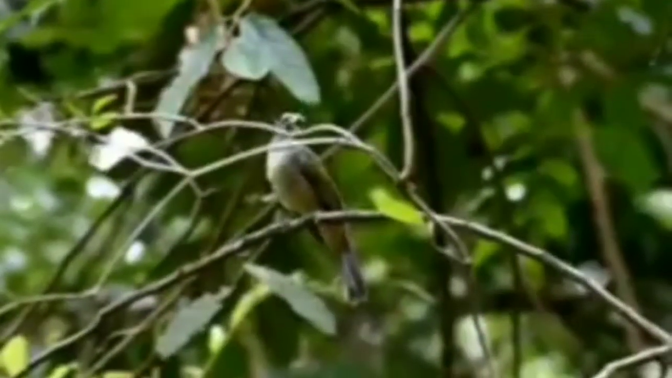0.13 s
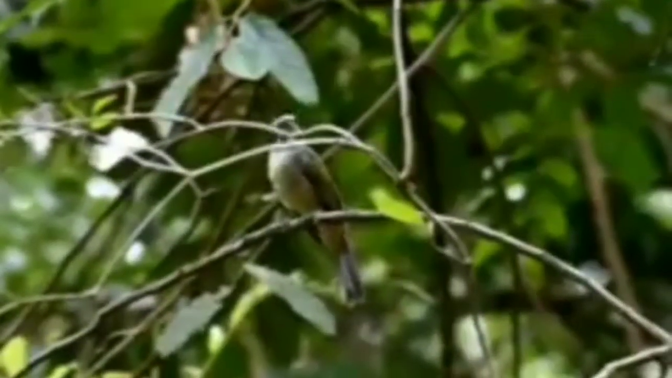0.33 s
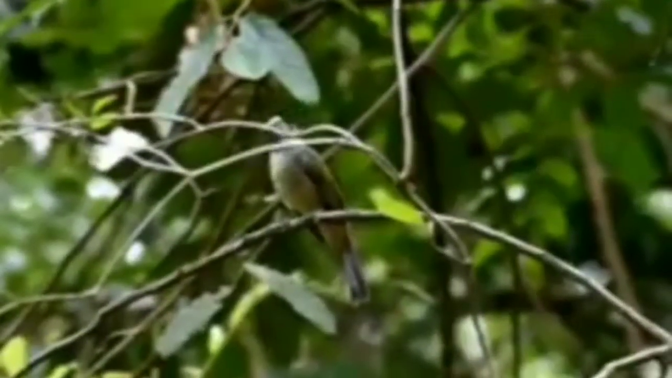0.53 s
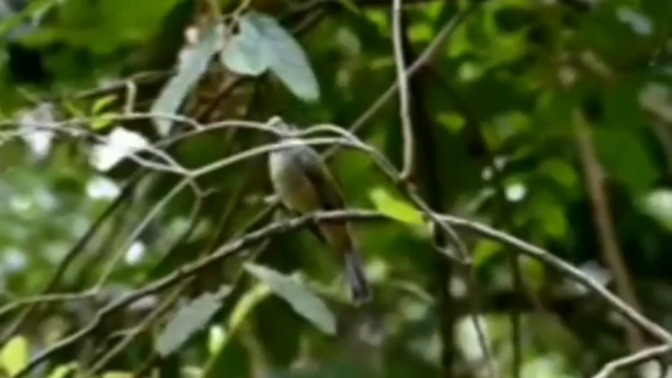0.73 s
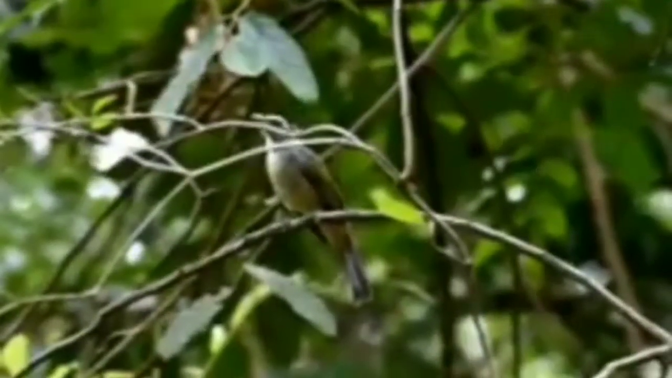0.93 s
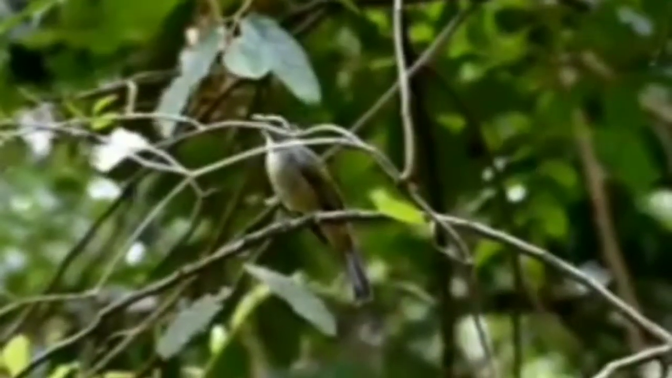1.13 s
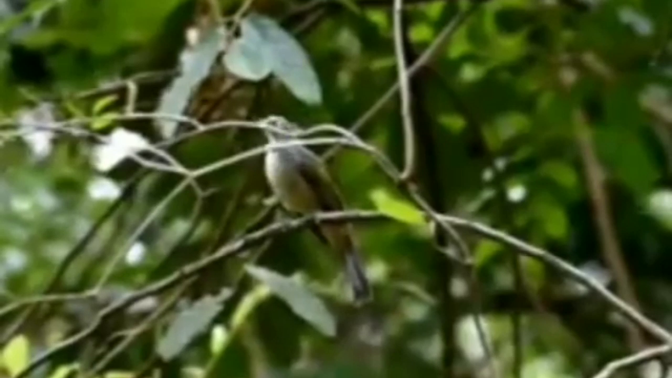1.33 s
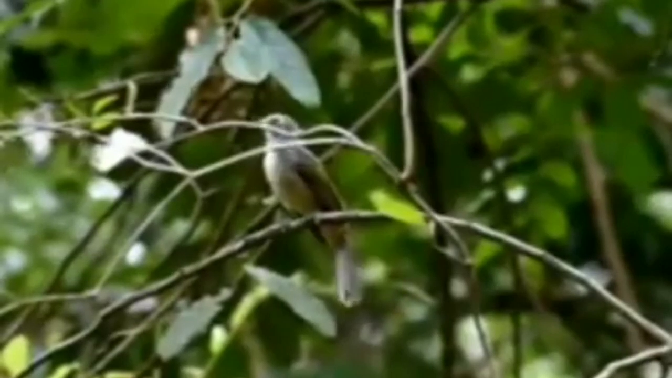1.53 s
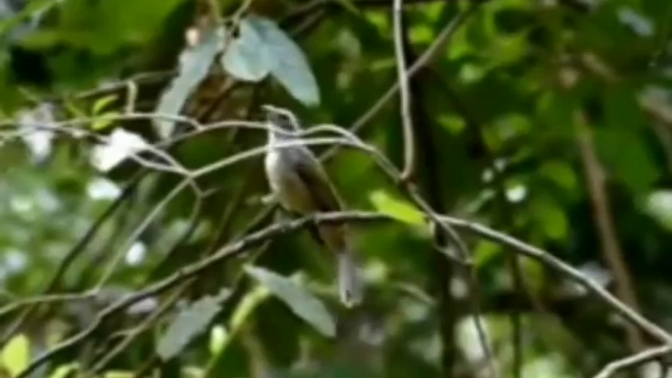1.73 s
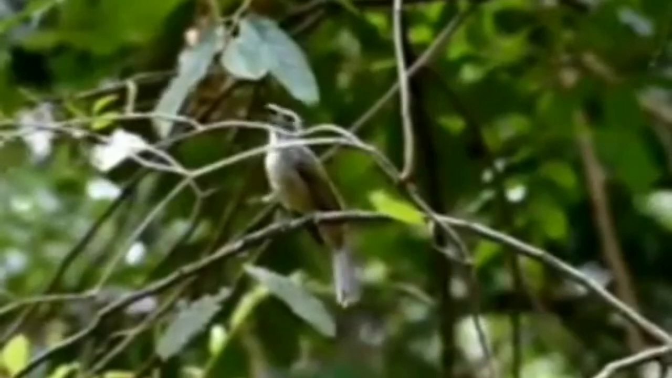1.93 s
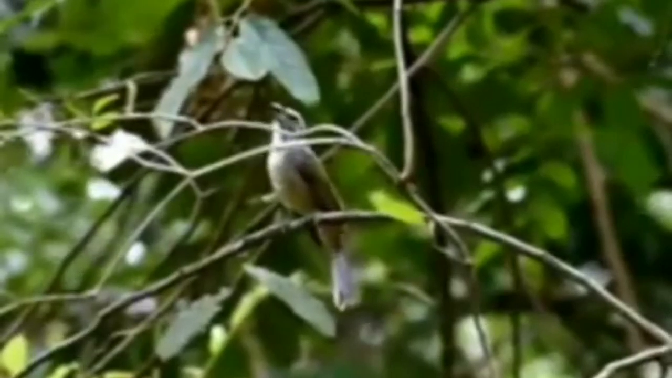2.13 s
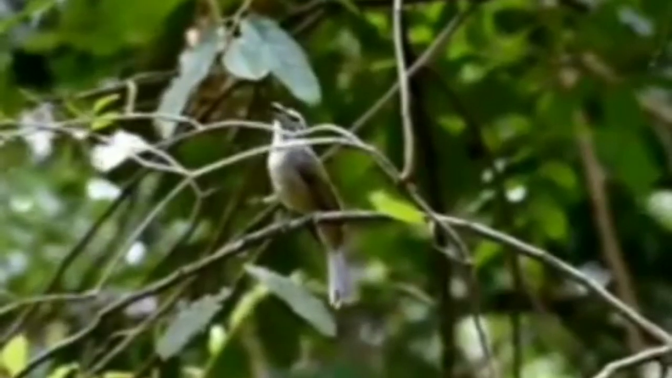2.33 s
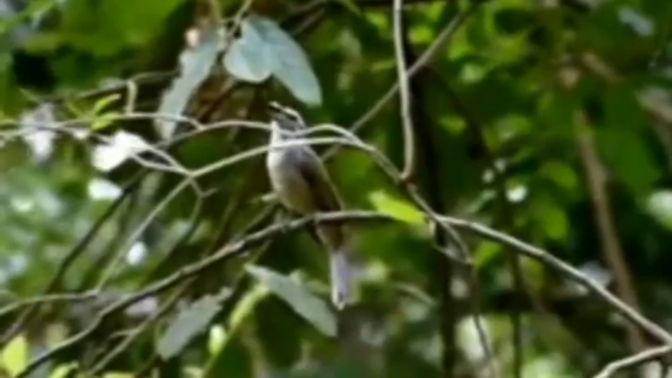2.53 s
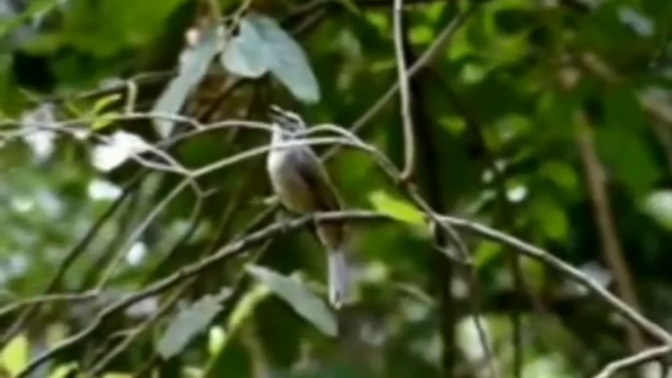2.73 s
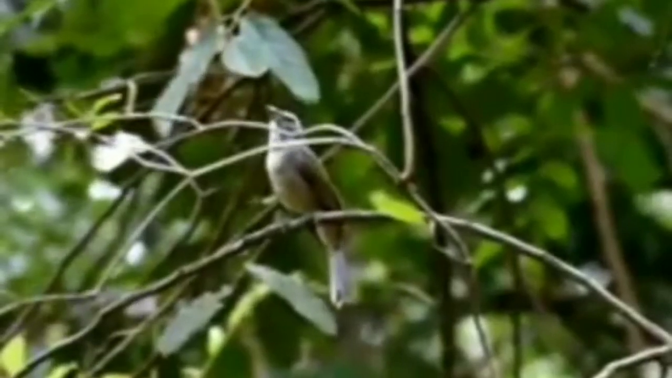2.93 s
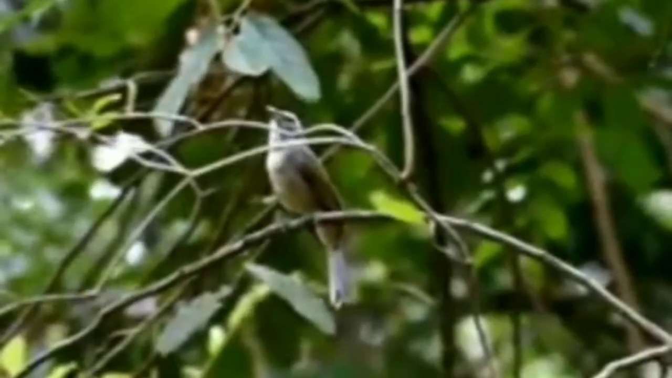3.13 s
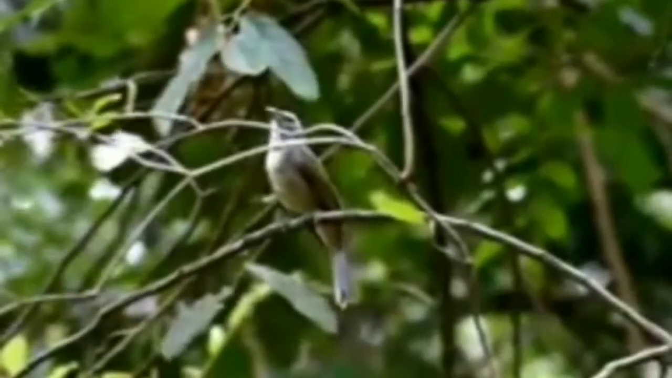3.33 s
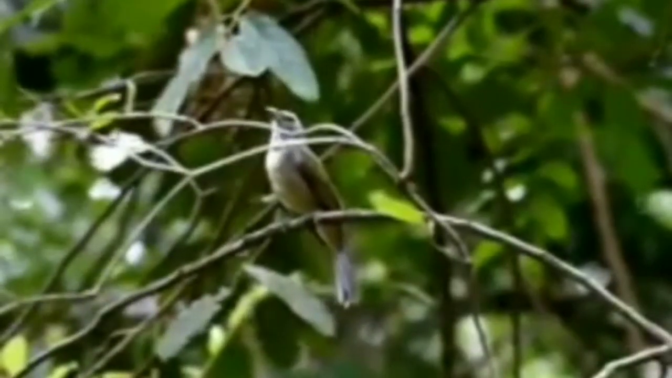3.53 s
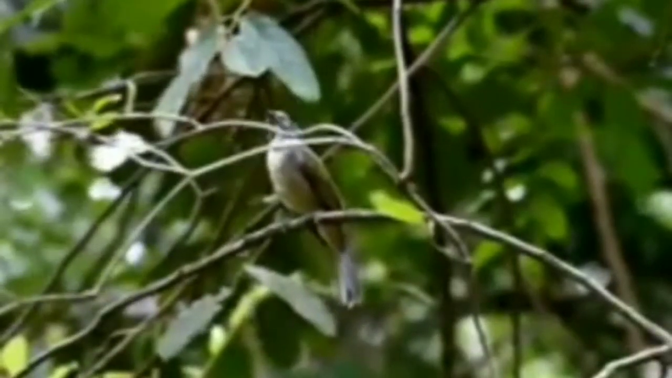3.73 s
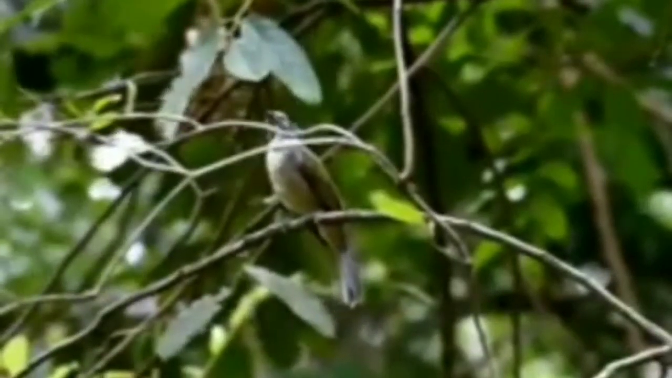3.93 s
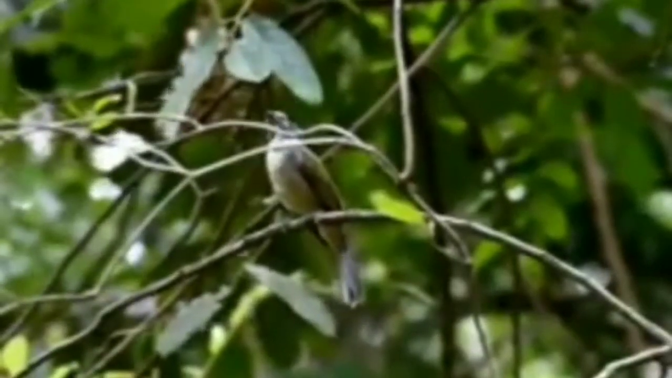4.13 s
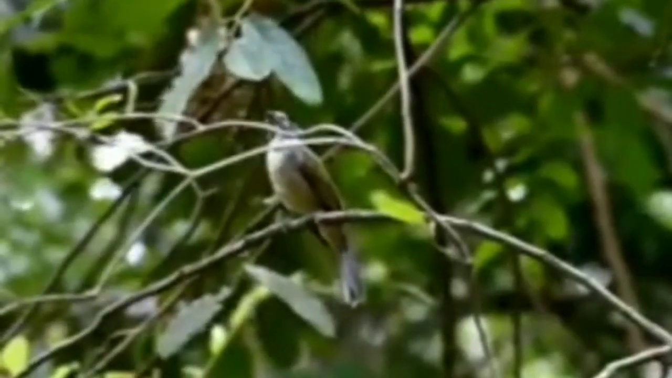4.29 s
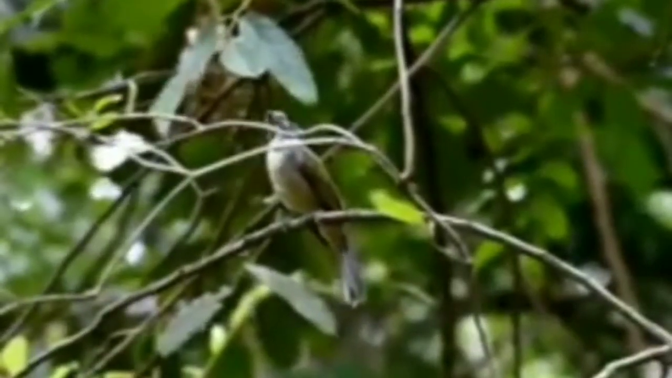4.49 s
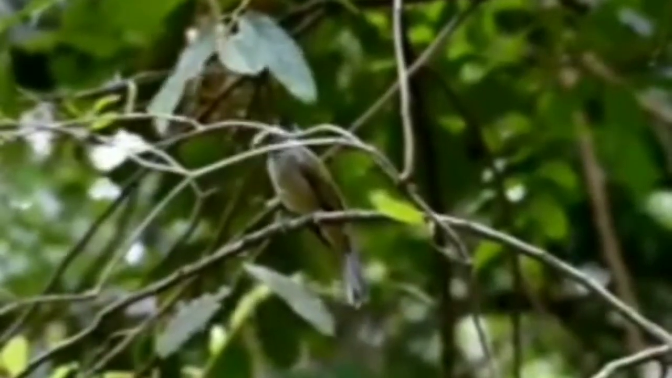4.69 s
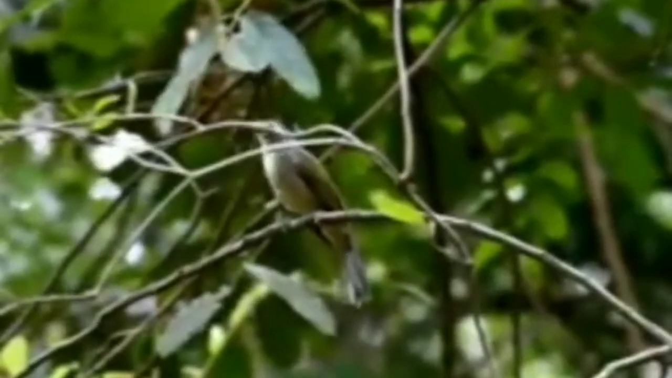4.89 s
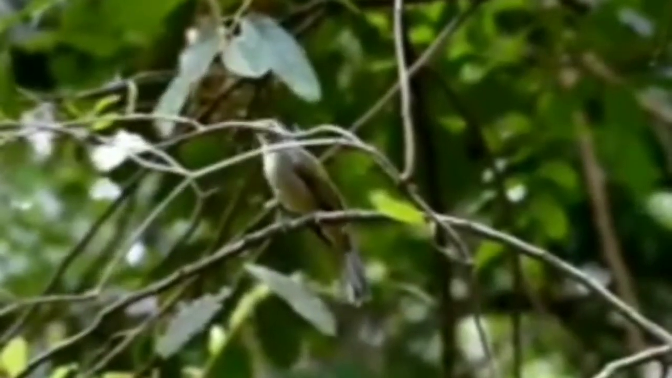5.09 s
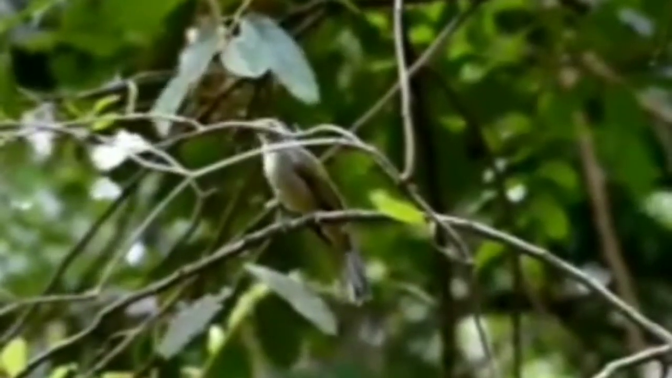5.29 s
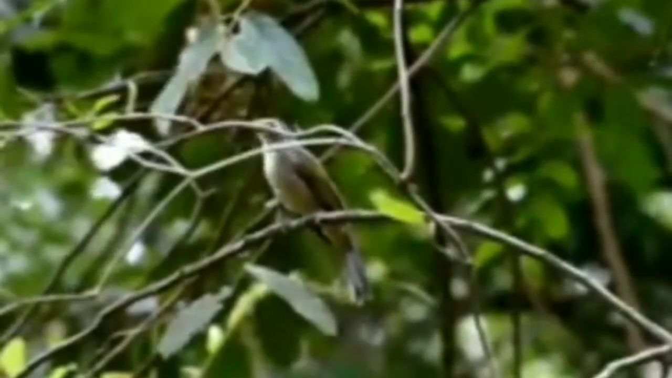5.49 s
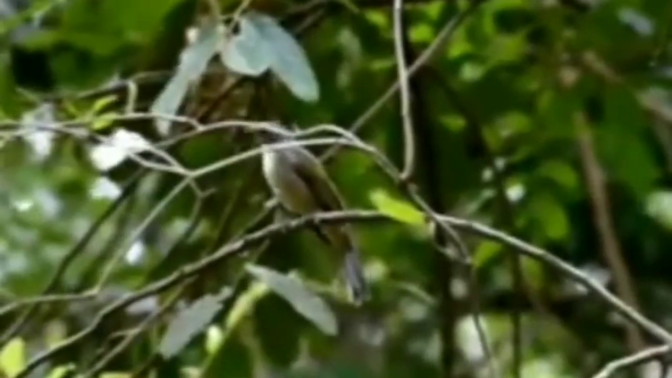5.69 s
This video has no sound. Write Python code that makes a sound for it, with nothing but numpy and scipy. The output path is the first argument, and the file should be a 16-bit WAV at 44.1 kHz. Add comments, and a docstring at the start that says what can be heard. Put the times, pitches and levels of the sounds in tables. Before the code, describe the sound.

A perched songbird is heard fairly close in leafy woodland, its notes followed by short scattered echoes. A more distant bird's slurred call opens, then quiet hiss with a dull double knock. The near phrase runs from about two to nearly four seconds: soft buzz, three strong downward whistles, one gentler drop. Very faint far calls and a leaf rustle precede the next soft buzz. The microphone catches little low end.

```python
"""A saltator sings from a branch in woodland: a soft buzzy note, three loud whistles sliding down, a softer one,
then a new buzz; each is a near sine on a gliding pitch, with a fast trill, faint overtones and a noisy spray.
Other birds, whistling the same way, answer from farther off with trilled slurs. Trunks and leaves scatter
every note into a short tail. Filtered noise makes the hiss of foliage and a brush of leaves, damped sines make
two soft knocks nearby; the recorder cuts away the bass and the extreme treble."""
import sys
import numpy as np
from scipy import signal
from scipy.fft import rfft, irfft
from scipy.io import wavfile
from scipy.ndimage import uniform_filter1d

SR = 44100
rng = np.random.default_rng(int(sys.argv[2]) if len(sys.argv) > 2 else 0)


def master(y):
    """Save y as 16-bit WAV."""
    cut = np.clip(np.atleast_2d(y).T, -1, 1)
    pcm = np.round(cut * 32767)  # scale
    wavfile.write(sys.argv[1], SR, pcm.astype(np.int16))


N = 253575
LOW_CUT_HZ, CUTOFF_HZ = 745, 13200
# a run-in of a quarter second lets a note be under way at 0 s
LEAD = SR // 4
TIME = np.arange(-LEAD, N) / SR  # s


def from_db(db):
    """Decibels to gain."""
    return 10 ** (np.asarray(db) / 20)


def rms_one(x):
    """Scale to unit power."""
    return x / np.sqrt(np.mean(x ** 2) + 1e-20)


def at_hz(points, hz):
    """Read a spectrum on a log-frequency axis."""
    freq, value = np.transpose(points)
    return np.interp(np.log(np.maximum(hz, 1)), np.log(freq), value)


def drift(rate, size):
    """Random wander about 0, straight lines between `rate` normal draws per second."""
    knots = np.arange(size) * rate / SR
    return np.interp(knots, np.arange(4096), rng.standard_normal(4096))


def coloured(spectrum, channels):
    """Unrelated noises of one colour, unit power."""
    hz = np.fft.rfftfreq(len(TIME), 1 / SR)
    white = rfft(rng.standard_normal((channels, len(TIME))))
    return rms_one(irfft(white * from_db(at_hz(spectrum, hz)), len(TIME)))


def band_pass(x, low_hz, high_hz):
    """A gentle band filter."""
    sections = signal.butter(2, [low_hz, high_hz], "band", fs=SR, output="sos")
    return signal.sosfilt(sections, x)


# Stirring air among the leaves. Each row: frequency in Hz, relative level in dB per Hz.
FOLIAGE_SPECTRUM = [(460, -31), (780, -0.5), (931, -1), (1160, 0), (1310, -2), (1470, -1), (1980, -3),
                    (2300, -3), (2810, -2.5), (3910, -3), (5700, -5), (9240, -5.5), (13000, -11)]
# How alike the hiss is at left and right. Each row: frequency in Hz, correlation (0 unrelated, 1 the same).
LEFT_RIGHT_LIKENESS = [(60, 0.01), (180, 0.04), (510, 0.11), (1500, 0.4), (4390, 0.26), (12800, 0.51)]
FOLIAGE_DB = -42.0  # before the recorder's cuts


def foliage(flutter_db):
    """A hiss from all round, partly alike left and right; octaves swell a little, together and on their own."""
    hz = np.fft.rfftfreq(N, 1 / SR)
    mid, side = rfft(rng.standard_normal((2, N)))
    alike = np.clip(at_hz(LEFT_RIGHT_LIKENESS, hz), 0, 1)
    colour = from_db(at_hz(FOLIAGE_SPECTRUM, np.clip(hz, 800, 12800))) * (hz < CUTOFF_HZ)
    spectrum = colour * (np.sqrt(1 + alike) * mid + np.sqrt(1 - alike) * side * [[1], [-1]])
    octave = np.floor(np.log2(np.maximum(hz / LOW_CUT_HZ, 1)))
    breeze = drift(7.2, N)
    hiss = 0
    for k in np.unique(octave):
        flutter = from_db(flutter_db * (0.21 * breeze + drift(17, N)))
        hiss = hiss + irfft(spectrum * (octave == k), N) * flutter
    return rms_one(hiss) * from_db(FOLIAGE_DB)


# The pitch lands after this share of a note, then moves on at this share of its speed.
SLIDE_SHARE, LANDED_SLOPE = 0.91, 0.23
# No slide is quite even: spread as a share of the pitch, bends per second.
WANDER, WANDER_PER_S = 0.0021, 35.4


def slide(age, length, from_hz, to_hz, sag_hz, scoop_hz=0, scoop_s=1):
    """Pitch of a note: it scoops in from above or below, slides along a shallow arc and levels off at the end."""
    part = age / (SLIDE_SHARE * length)
    part = np.minimum(part, 1 + LANDED_SLOPE * (part - 1))
    arc = from_hz + (to_hz - from_hz) * part - sag_hz * (1 - (2 * part - 1) ** 2)
    scoop = scoop_hz * np.exp(-(age / scoop_s) ** 2)
    return (arc + scoop) * (1 + WANDER * drift(WANDER_PER_S, len(age)))


ATTACK_DB = 37.5  # a note swells from this far down
RELEASE_S, RELEASE_DB = 0.019, 17  # and is shut off this fast and this far


def swell(age, length, attack, hold, fade):
    """Level of a note in dB below its top: attack, hold, a steady fade and a quick release."""
    rise = -ATTACK_DB * np.maximum(1 - age / attack, 0) ** 2
    sink = -fade * np.maximum(age - attack - hold, 0)
    release = -RELEASE_DB * np.maximum(1 - (length - age) / RELEASE_S, 0) ** 2
    return rise + sink + release


# Overtones of the whistle. Each row: multiple of the pitch, relative level in dB.
WHISTLE_OVERTONES = [(2, -44), (3, -47.5), (4, -43.5), (5, -35.5), (6, -34)]
# How the beak passes the overtones. Each row: frequency in Hz, gain in dB.
BEAK_GAIN = [(3800, 8), (4500, 2), (5300, 4.5), (6800, -7), (8200, 2), (9300, 14), (10000, -1), (11000, 0),
             (12200, -0.5), (13200, -12)]


def whistle(note, trill_hz, trill_s, waver, overtone_db, rasp):
    """One note of the syrinx: a near sine on a gliding pitch, shaken by a fast trill; returns (tone, overtones)."""
    start, length, from_hz, to_hz, sag_hz, level_db, attack, hold, fade, depth_hz, *scoop = note
    on = (TIME >= start) & (TIME <= start + length)
    age = TIME[on] - start
    glide = slide(age, length, from_hz, to_hz, sag_hz, *scoop)
    trill_rate = trill_hz * (1 + 0.0067 * drift(43, len(age)))
    trill = np.sin(2 * np.pi * np.cumsum(trill_rate) / SR)
    # the trill calms into a pure whistle
    depth = depth_hz * np.exp(-(age / trill_s) ** 2)
    hz = glide * (1 + waver * drift(252.7, len(age))) + depth * trill
    phase = 2 * np.pi * np.cumsum(hz) / SR
    # the trill also pumps the loudness
    pumping_db = 35 * depth / glide * trill
    gain = np.sqrt(2) * from_db(level_db + swell(age, length, attack, hold, fade) + pumping_db)
    # short ramps keep the ends from clicking
    gain = gain * np.clip(np.minimum(age, length - age) / 0.0014, 0, 1)
    out = np.zeros((2, len(TIME)))
    out[0, on] = gain * np.sin(phase)
    # soft notes keep relatively more of their overtones
    edge = from_db(overtone_db) * gain ** 0.67
    for k, db in WHISTLE_OVERTONES:
        # uneven cycles blur the higher overtones most, and each one flickers
        blurred = round(k) * (phase + rasp * drift(900, len(age)))
        flicker_db = 4.0 * drift(45, len(age))
        out[1, on] += edge * from_db(db + at_hz(BEAK_GAIN, k * hz) + flicker_db) * np.sin(blurred)
    return out


# Nearest reflectors, ground and trunks. Each row: delay in seconds, level in dB against the direct sound.
NEAR_ECHOES = [(.004, -14), (.0135, -29), (0.028, -19), (0.0503, -27), (0.06, -46), (0.083, -41)]


def woodland(x, direct_db, scatter_db, t60, late_db, late_t60, side_db):
    """Direct sound, a few distinct echoes, dense scatter from leaves and a faint long tail from far trunks."""
    t = np.arange(SR) / SR
    decay = from_db(-60 * t / t60) + from_db(late_db - 60 * t / late_t60)
    decay = decay * (1 - np.exp(-t / 0.0014))
    responses = rng.standard_normal((3, SR)) * decay / np.sqrt(np.sum(decay ** 2))
    one, other, side = signal.fftconvolve(x[None], responses, axes=1)[:, :len(x)]
    # stirring leaves keep shifting the scatter between two sets of paths, 4 turns a second
    stir = 2 * np.pi * 4.0 * TIME
    mid = one * np.cos(stir) + other * np.sin(stir)
    echoes = sum(from_db(db) * np.interp(TIME - delay, TIME, x) for delay, db in NEAR_ECHOES)
    scatter = mid + from_db(side_db) * side * [[1], [-1]]
    return (from_db(direct_db) * (x + echoes) + from_db(scatter_db) * scatter)[:, LEAD:]


# The answering birds' notes, the first under way at 0 s. Each row: start in seconds, length in seconds,
# from in Hz, to in Hz, sag of the slide in Hz, level in dB before the woodland, attack in seconds,
# hold in seconds, fade in dB per second, trill depth at the start in Hz.
ANSWER_NOTES = [ (-.135, .165, 3146, 2333, -69.5, -16, 0.018, 0.054, 69, 177),
                (0.033, 0.073, 2500, 2820, -3, -35, 0.022, .005, 243, 103),
                (0.082, .25, 2262, 1789, 61, -22.5, 0.04, 0.084, 164.5, 135),
                (.31, .082, 1760, 1754, -3.5, -39.5, 0.026, 0.023, 100, 206.5),
                (4.468, 0.13, 2560, 2194, 36, -54, .07, 0.036, 50, 60),
                (4.88, 0.475, 2000, 1946, 41.5, -51.5, 0.12, 0.031, 55, 3),
                (4.95, 0.3, 2976, 2666, 34.5, -50, 0.056, .005, 62, 30),
                (5.252, .46, 3300, 2297, 151.5, -48.5, 0.28, 0.22, 20, 190), ]
ANSWER_TRILL_HZ, ANSWER_TRILL_S = 124.45, 0.15


def answering_birds():
    """Farther off, so more of each note comes by way of the trees, and the leaves swallow the high overtones."""
    tone, overtones = sum(whistle(note, ANSWER_TRILL_HZ, ANSWER_TRILL_S, waver=0.0067, overtone_db=4, rasp=0.1)
                          for note in ANSWER_NOTES)
    call = tone + band_pass(overtones, 2000, 4900)
    return woodland(call, direct_db=0.5, scatter_db=-7.5, t60=0.42, late_db=-13, late_t60=0.91, side_db=-8.5)


# Soft knocks nearby. Each row: start in seconds, starting level in dB, pitch in Hz.
SOFT_KNOCKS = [(0.888, -34, 1060), (0.922, -47, 1450)]


def knocks(t60):
    """Each knock is one dull, quickly damped ring."""
    out = 0
    for start, db, hz in SOFT_KNOCKS:
        age = np.maximum(TIME[LEAD:] - start, 0)
        out = out + from_db(db - 60 * age / t60) * np.sin(2 * np.pi * hz * age)
    return out


# The near bird's notes. Each row: start in seconds, length in seconds, from in Hz, to in Hz,
# sag of the slide in Hz, level in dB before the woodland, attack in seconds, hold in seconds,
# fade in dB per second, trill depth at the start in Hz, scoop into the note in Hz, scoop time in seconds.
SONG_NOTES = [ (1.929, 0.24, 2536, 1997, 134.5, -29, 0.045, 0.15, 130, 157, -7, .01),
              (2.326, 0.28, 3795, 2313, -8, -9.5, 0.09, 0.12, 198, 9, -110, 0.021),
              (2.675, 0.27, 2766, 2025, 7.5, -9, 0.062, .018, 73, -5, 691.5, 0.058),
              (3.004, .29, 2997, 2288, -128, -9.5, 0.074, 0.11, 103, 2, -590, 0.027),
              (3.353, .35, 2065, 1399, 25, -25, 0.0048, 0.12, 113, -7, 1649, .0083),
              (5.671, 0.27, 2305, 1967, -0.5, -24.5, 0.065, .1, 130, 206, 2, .01), ]
# The dry spray that rides on the whistles. Each row: frequency in Hz, relative level in dB per Hz.
SPRAY_SPECTRUM = [(4000, -13.5), (5300, -15), (7000, -17), (9300, -7), (10300, -9.5), (12000, -7),
                  (13000, -16)]
SONG_TRILL_HZ, SONG_TRILL_S = 93, 0.11


def near_bird():
    """The whistle comes straight from the branch; its overtones are beamed aside and arrive mostly scattered."""
    tone, overtones = sum(whistle(note, SONG_TRILL_HZ, SONG_TRILL_S, waver=0.0021, overtone_db=-4.5, rasp=0.17)
                          for note in SONG_NOTES)
    loudness = np.sqrt(np.abs(uniform_filter1d(tone ** 2, size=256)))
    spray = from_db(-38.5) * loudness ** 0.83 * coloured(SPRAY_SPECTRUM, channels=1)[0]
    straight = woodland(tone, direct_db=-1.0, scatter_db=-9.0, t60=0.35,
                        late_db=-16.5, late_t60=1.0, side_db=-9)
    aside = woodland(overtones + spray, direct_db=-4.0, scatter_db=0.5, t60=0.34,
                     late_db=-29, late_t60=0.8, side_db=-7.5)
    return straight + aside


# A leaf brushes past another. Each row: time of the peak in seconds, time from the peak down to 1/e in seconds,
# level at the peak in dB, centre in Hz.
LEAF_RUSTLES = [(4.81, 0.076, -46, 7900)]


def rustles():
    """Short soft swells of bright noise."""
    out = 0
    for peak, width, db, hz in LEAF_RUSTLES:
        noise = rms_one(band_pass(rng.standard_normal((2, N)), hz / 1.25, hz * 1.2))
        out = out + from_db(db) * np.exp(-((TIME[LEAD:] - peak) / width) ** 2) * noise
    return out


def scene():
    """Birds, knocks and a brush of leaves over the hiss of the wood."""
    birds = near_bird() + answering_birds()
    return birds + knocks(t60=0.031) + rustles() + foliage(flutter_db=1.14)


def record(dry):
    """The recorder: steep cuts at both ends of the band."""
    band = signal.firwin(1025, [LOW_CUT_HZ, CUTOFF_HZ], pass_zero=False, window=("kaiser", 6), fs=SR)
    return signal.fftconvolve(dry, band[None], mode="same", axes=1)


dry = scene()
out = record(dry)
master(out)
```